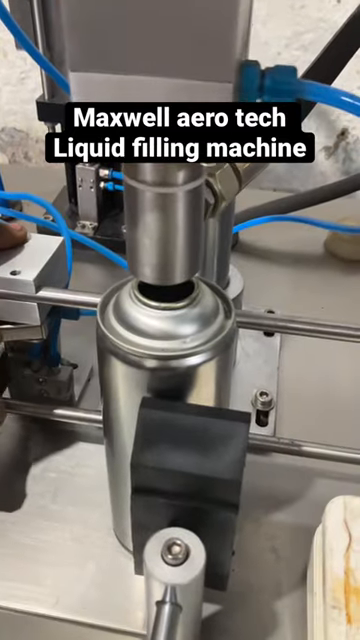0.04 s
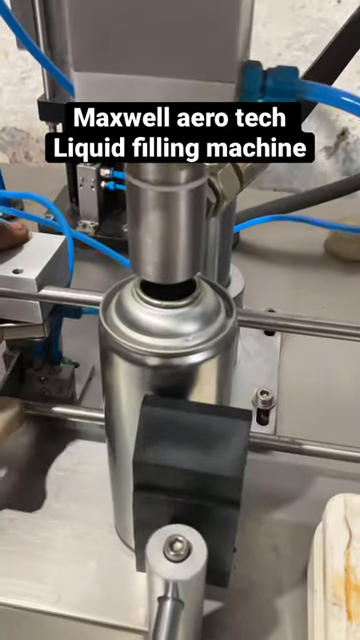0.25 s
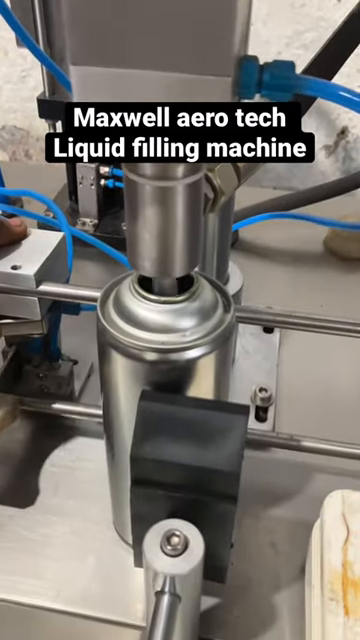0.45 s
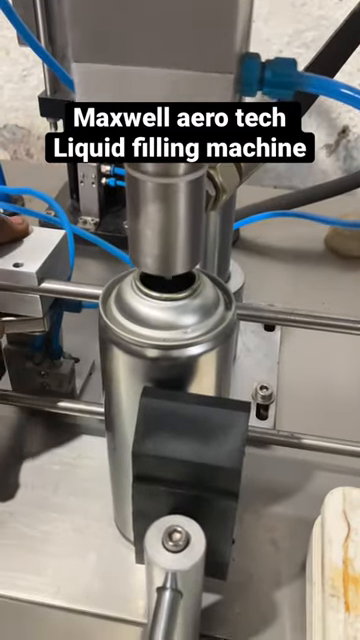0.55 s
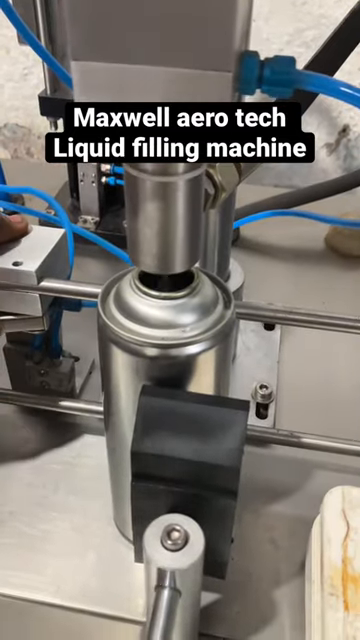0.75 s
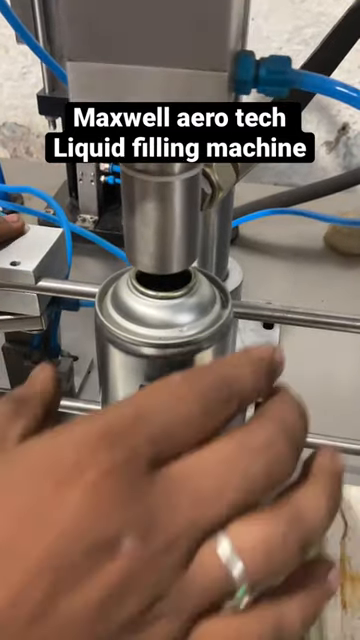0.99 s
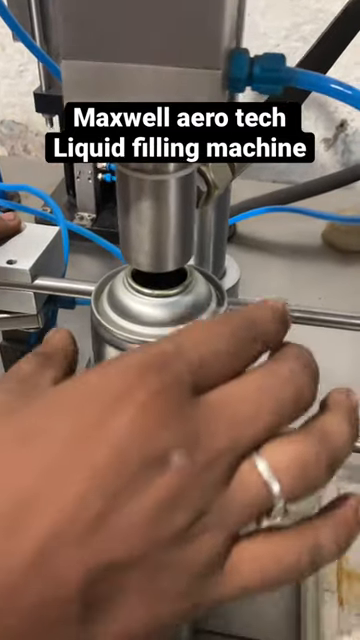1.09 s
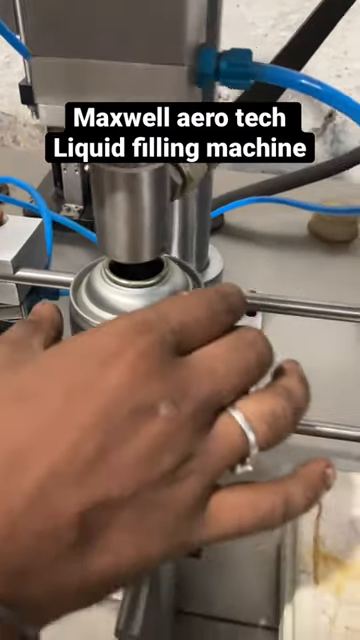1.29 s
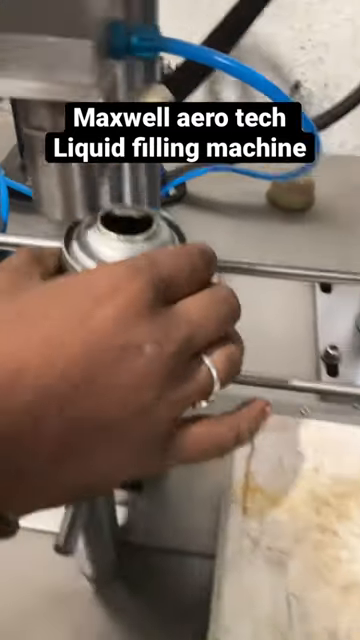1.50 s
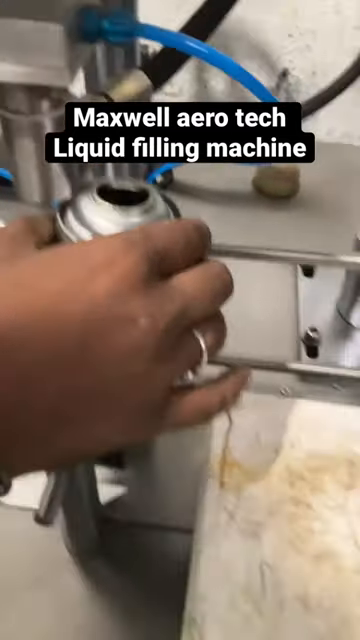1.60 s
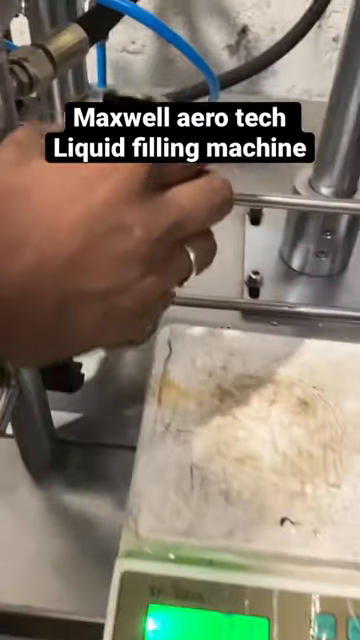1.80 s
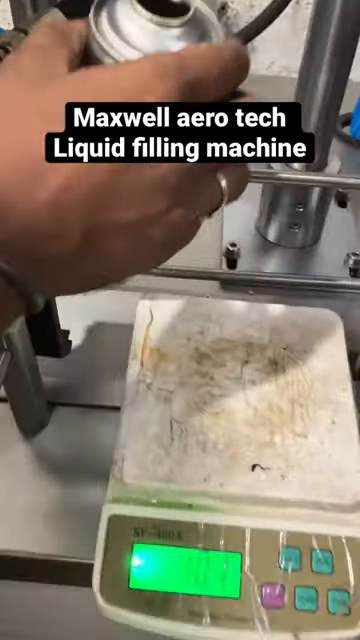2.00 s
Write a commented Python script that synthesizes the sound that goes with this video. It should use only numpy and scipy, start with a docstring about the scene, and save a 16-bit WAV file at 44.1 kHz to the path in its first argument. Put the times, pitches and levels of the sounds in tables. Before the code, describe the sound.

A pneumatic machine blasts hissing air, then a metal can clinks against guide rails.

```python
"""An air-powered filling machine

In a small workshop a valve clicks and a blast of air shakes the machine's frame. The cylinder
then empties in a long fading hiss and a last puff. A hand pulls out the filled steel can, which
rings as it knocks against the guide rails. A motor hums low underneath."""
import sys
import numpy as np
from scipy import signal
from scipy.fft import rfft, irfft, next_fast_len
from scipy.io import wavfile
from scipy.ndimage import map_coordinates

SR = 44100
rng = np.random.default_rng(int(sys.argv[2]) if len(sys.argv) > 2 else 0)


def transcribe(signal):
    """Save signal, clipped to [-1, 1], as a 16-bit WAV file at the path in sys.argv[1]."""
    frames = np.atleast_2d(signal).T
    limited = np.clip(frames, -1, 1)
    pcm = np.round(limited * 32767).astype(np.int16)
    wavfile.write(sys.argv[1], SR, pcm)


N = 90404
T = np.arange(N) / SR

# A colour says how strong a noise is from low to high. Each row: frequency in Hz, relative dB.
WORKSHOP_COLOUR = [(20, -32.5), (45, -12.5), (75, 0.5), (130, -5.5), (200, -8), (400, -11.5), (800, -15.5),
                   (1400, -21.5), (2300, -30), (3500, -32.5), (5000, -38.5), (9000, -37), (15500, -42)]
BUMP_COLOUR = [(70, -8.5), (180, -12.5), (380, 2.5), (750, -4), (1200, -14), (2500, -28), (8000, -43)]
SCRAPE_COLOUR = [(200, -0.5), (500, -1), (1900, -1.5), (2700, -10), (3700, -6.5), (5500, -19.5),
                 (8500, -9.5), (11500, -11.5), (15000, -11.5)]
CLICK_COLOUR = [(500, -11.5), (2400, -19), (3200, -4), (4500, -4.5), (6500, -0.5), (8200, -4),
                (11000, -0.5), (14500, -0.5), (16000, -7.5)]
CLACK_COLOUR = [(120, -22), (350, -2), (600, 2), (850, 1), (1080, -6), (1350, -1), (1700, 3), (1950, 0),
                (2350, -24), (6000, -34)]
FRAME_COLOUR = [(35, -16.5), (60, 10), (130, -6), (220, -23), (500, -31), (1500, -62)]
LEAK_COLOUR = [(150, -25), (800, -8.5), (1500, -4.5), (2700, -11), (3400, -3.5), (4500, -11.5), (6000, -14),
               (9000, -16), (10900, -5.5), (12200, -11), (15500, -1)]
SPURT_COLOUR = [(300, -12.5), (1500, -8), (3500, -4), (6000, -20.5), (8000, -8), (11000, 0.5),
                (13000, -5.5), (14700, 10.5), (15700, -9.5)]
BLAST_COLOUR = [(200, 5.5), (400, -11), (650, -4), (850, -10), (1100, -13), (1500, -5.5), (2100, -7.5),
                (3200, -6), (4200, -3), (6000, -1), (8000, -9), (10000, -4.5), (12000, -1.5), (14500, -6),
                (15700, -10)]
BITE_COLOUR = [(300, -30.5), (1200, -16.5), (2300, -0.5), (3300, -5), (4100, -1.5), (5300, 2.5),
               (6500, 4.5), (7500, -5.5), (10000, -9), (15200, -15)]
VENT_COLOUR = [(300, -33.5), (700, -14.5), (1400, -9.5), (2000, -13), (3400, -4.5), (4200, -16.5),
               (6200, -16), (7300, -3), (8500, 1.5), (11000, -0.5), (13000, 3), (14600, 7.5), (15700, -1)]
PUFF_COLOUR = [(300, -16), (800, -6), (1200, -4.5), (1580, 1), (1900, -10.5), (3500, -3.5), (5000, -11),
               (6200, -7), (7500, 0.5), (11000, 0), (13000, 3.5), (15600, 0)]
TRICKLE_COLOUR = [(500, -13.5), (1500, -6.5), (2300, -13), (3400, -0.5), (4200, -5), (5500, -11.5),
                  (8000, -17), (10300, -5.5), (12700, -12), (14000, -12.5), (15600, -7)]
SNAP_COLOUR = [(200, -3), (900, -18), (3300, -12), (4300, -2), (6800, -9), (8000, 0), (10400, -1),
               (11500, -8), (13300, -1), (14500, 5), (15700, 1)]

# How the longer sounds swell and fade. Each row: time in seconds, level in dB.
WORKSHOP_LEVEL = [(0, -43), (.2, -40.5), (.45, -49), (.9, -56.5), (1.1, -51), (1.4, -52), (1.9, -50),
                  (2.05, -49.5)]
MOTOR_LOAD = [(0, 6.5), (.22, 7.5), (.45, 2), (.6, -9), (.9, -1), (1.1, 2), (2.05, -2)]
SCRAPE_LEVEL = [(1.48, -80), (1.51, -50), (1.59, -59), (1.74, -49), (1.8, -67), (1.85, -64.5), (1.875, -54),
                (1.9, -58), (1.935, -50.5), (1.98, -58.5), (2.05, -61)]
SHAKE_LEVEL = [(.24, -58.5), (.257, -23.5), (.285, -32), (.322, -20), (.345, -35.5), (.395, -27),
               (.425, -47.5), (.52, -56), (.57, -43), (.65, -47.5), (.72, -41), (.81, -44.5), (.88, -50.5),
               (1.1, -67)]
# The motor's tones. Each row: pitch in Hz, level in dB before the load is added.
MOTOR_TONES = [(46.6, -55), (137, -58), (199, -66)]

# Short sounds. Each row: start in seconds, level in dB.
SOFT_BUMPS = [(0.054, -45.5), (1.009, -41.5), (1.515, -54)]
AIR_SQUEAKS = [(0.673, -16)]
VALVE_SNAPS = [(.3897, -5), (.4005, -16)]
# Thumps on the table. Each row: start in seconds, deep tone in dB, upper tone in dB.
TABLE_THUMPS = [(1.019, -34.5, -50), (1.521, -31.5, -41), (1.661, -32.5, -32.5)]
# Those two tones. Each row: pitch in Hz, seconds to fade by 60 dB.
TABLE_TONES = [(108, .1), (340, .15)]
# Ringing metal. Each row: pitch in Hz, relative level in dB, seconds to fade by 60 dB.
CAN_TONES = [(345, 1, .12), (560, -9, .05), (740, -7, .05), (1312, -2, .14), (1450, -9, .07),
             (1600, -5, .05), (1795, -4, .07), (2007, 0, .11), (2121, -12, .28), (3612, -19, .08),
             (3941, -23, .12), (4743, -17, .08), (8120, -22, .1), (10220, -24, .08)]
CLUNK_TONES = [(645, -33, .4), (1105, -29, .22)]
# Knocks on the can. Each row: start in seconds, ring in dB, click in dB, change to the low tones
# in dB, dull clack in dB, a number that multiplies the ring time.
CAN_KNOCKS = [(.165, -25.5, -27.5, -28, -48, .2), (.707, -43, -50, 1, -30.5, .6),
              (1.4975, -48, -35, -23, -47, 1.8), (1.516, -53, -44, -10, -52, 1),
              (1.612, -24.5, -24.5, -2, -19.5, .8), (1.6333, -44, -37, 6, -28, .45),
              (1.7157, -45, -32, 2, -22.5, .45)]

# Pitches at which each part likes to ring. Each row: pitch in Hz, width in Hz, relative dB.
FRAME_RESONANCES = [(65.9, 6, -6), (109.4, 6, 0), (181, 12, -12), (250, 50, -13), (320, 70, -14)]
PIPE_RESONANCES = [(645, 22, 0), (1100, 40, -2), (2070, 70, -4), (4105, 35, 1), (4880, 100, -4),
                   (5958, 30, 0), (6982, 22, 5), (8668, 30, -2), (10518, 25, -1)]
PORT_RESONANCES = [(2400, 300, -10), (4100, 150, 3), (4750, 160, -2), (5250, 220, 0), (6070, 130, -2),
                   (6620, 90, -5), (7930, 110, -9)]
# Jets of air: leak, spurt, blast, the exhaust's sharp first bite, long vent, puff, last trickle.
# Each row: start in seconds, level in dB, rise in seconds, hold in seconds, sag while open in dB
# per second, fall after closing in dB per second, brief boost or dip on opening in dB.
AIR_JETS = [(0.0, -44, 0.00071, 0.44, 3, 130, 1.5), (0.21, -28, 0.0033, 0.035, 63, 412, -6.5),
            (0.236, -18, 0.019, 0.11, 17.5, 253, 3.5), (.391, -21.5, .004, .27, 58, 150, 6.5),
            (0.393, -18.5, .008, 0.36, 31.5, 170, -1.5), (0.746, -27, 0.0078, 0.012, 49, 163, 3),
            (0.76, -46.5, 0.11, 0.15, 5.5, 132, 1)]

# The room's echo. Each row: frequency in Hz, seconds to fade by 60 dB.
ROOM_FADE = [(200, 0.33), (2000, 0.45), (12000, 0.031)]
# Left and right channels. Each row: frequency in Hz, how alike their noise is (1 means the same).
CHANNEL_LIKENESS = [(100, .99), (350, 0.92), (800, 0.23), (2200, 0.45), (3400, 0.73), (4600, 0.6), (5500, 1),
                    (7000, 0.81), (7900, 1), (9000, 0.57), (10200, 0.26), (11200, 1), (12300, 1), (13200, 0.23),
                    (14700, 1)]
# Each row: frequency in Hz, how far the left wave runs ahead in radians.
CHANNEL_LEAD = [(20, 0), (300, -.1), (800, -.35), (1400, .1), (2300, 1.3), (4200, 2.0), (5500, 3.14),
                (6800, 4.5), (7700, 6.1), (9100, 6.4), (10200, 7.8), (11200, 9.3), (12200, 9.5), (13300, 10.9),
                (14500, 12.5)]
# Each row: frequency in Hz, left level minus right level in dB.
CHANNEL_BALANCE = [(60, -.3), (400, -0.63), (1200, -2.7), (2400, -1.5), (4400, 1), (8000, 1)]

LOW_TONES_HZ, CAN_PAN_DB = 1900, -1.5  # the can sits a little to the right
RING_ATTACK_S, CLICK_ATTACK_S, CLUNK_S = .0013, .00015, .248
JET_LOW_HZ, KICK_S = 169, .014
PIPES_DB, PORT_DB, FLUTTER_DB = -11.5, -6, .3
ROOM_DB, WALLS_DB, WALLS_DELAY_S = -10.5, -11, .008
CEILING, TOP_HZ = .85, 15780


def amp(db):
    """Turn decibels into a number to multiply by."""
    return 10 ** (np.asarray(db) / 20)


def unit(x):
    """Scale a signal so its average power is 1."""
    return x / np.sqrt(np.mean(x ** 2) + 1e-20)


def along(points, hz):
    """Read between the rows of a frequency table, with octaves evenly spaced."""
    freqs, values = np.transpose(points)
    return np.interp(np.log(hz + 1), np.log(freqs + 1), values)


def level(points):
    """Join (seconds, dB) points into a loudness curve."""
    return amp(np.interp(T, *np.transpose(points)))


def wobble(rate):
    """A smooth curve through `rate` random values a second."""
    return map_coordinates(rng.standard_normal(2048), [T * rate], mode="wrap")


def filtered(x, response):
    """Multiply each frequency in x by response(frequency)."""
    size = next_fast_len(N + SR // 2)
    return irfft(rfft(x, size) * response(np.fft.rfftfreq(size, 1 / SR)), size)[..., :N]


def noise(response):
    """Filtered stereo noise, partly alike in the left and right channels."""
    def split(hz):
        angle = np.arccos(np.clip(along(CHANNEL_LIKENESS, hz), -1, 1)) / 2
        return response(hz) * np.array([np.cos(angle), np.sin(angle)])
    common, apart = filtered(rng.standard_normal((2, N)), split)
    return unit(np.array([common + apart, common - apart]))


def rush(colour, low_hz=25):
    """Noise of a given colour, turned down below low_hz."""
    return noise(lambda hz: amp(along(colour, hz)) * hz ** 2 / (hz ** 2 + low_hz ** 2))


def ringing_noise(resonances):
    """Noise squeezed into narrow bands, so that it whistles."""
    return noise(lambda f: sum((-1) ** k * amp(db) * 1j * f * width / (hz**2 - f**2 + 1j * f * width)
                               for k, (hz, width, db) in enumerate(resonances)))


def struck(start, fade, attack):
    """Rise quickly, then die away by 60 dB every `fade` seconds."""
    t = np.maximum(T - start, 0)
    return (1 - np.exp(-t / attack)) * np.exp(-np.log(1000) * t / fade)


def hits(events, fade, attack):
    """A loudness curve with one strike for each (seconds, dB) row."""
    return sum(amp(db) * struck(start, fade, attack) for start, db in events)


def room(x):
    """The workshop's short echo, in which the treble dies first."""
    hz, t, spectrum = signal.stft(rng.standard_normal((2, SR // 2)), SR, nperseg=256)
    decay = np.exp(-np.log(1000) * t / along(ROOM_FADE, hz)[:, None])
    tail = signal.istft(spectrum * decay, SR, nperseg=256)[1]
    return signal.fftconvolve(x, tail / np.linalg.norm(tail[0]), axes=1)[:, :N]


def walls(x):
    """Add eight quick echoes from the steel panels near the nozzle."""
    delays = rng.uniform(0.1021, 1, 8) * WALLS_DELAY_S
    gain = amp(WALLS_DB) / np.sqrt(len(delays))
    return filtered(x, lambda hz: 1 + gain * sum(np.exp(-2j * np.pi * hz * s) for s in delays))


def workshop():
    """The room rumbles, and a slightly unsteady motor hums louder under load."""
    hum = sum(amp(db) * np.sqrt(2) * np.sin(2 * np.pi * hz * T + 0.13 * wobble(4.7))
              for hz, db in MOTOR_TONES)
    return level(WORKSHOP_LEVEL) * rush(WORKSHOP_COLOUR) + level(MOTOR_LOAD) * hum


def handling():
    """Nozzle and hand bump softly; the can thumps the table and scrapes unevenly over it."""
    bumps = hits(SOFT_BUMPS, fade=.29, attack=.00069) * rush(BUMP_COLOUR)
    thumps = np.zeros(N)
    for start, *levels in TABLE_THUMPS:
        for db, (hz, fade) in zip(levels, TABLE_TONES):
            thumps += amp(db) * struck(start, fade, attack=.006) * np.sin(2 * np.pi * hz * (T - start))
    scrape = level(SCRAPE_LEVEL) * amp(2.5 * wobble(110)) * rush(SCRAPE_COLOUR)
    return bumps + thumps + scrape


def can():
    """Each knock clicks, clacks and rings the can; some ring mostly its high tones."""
    out = np.zeros((2, N))
    click, clack = rush(CLICK_COLOUR), rush(CLACK_COLOUR)
    for start, ring_db, click_db, low_db, clack_db, length in CAN_KNOCKS:
        for hz, db, fade in CAN_TONES:
            phase = 2 * np.pi * hz * (T - start) + .25 * wobble(90)
            gain = amp(ring_db + db + low_db * (hz < LOW_TONES_HZ) + rng.normal(0, 1))
            out += gain * struck(start, fade * length, RING_ATTACK_S) * np.sin(phase)
        out += amp(click_db) * struck(start, fade=.029, attack=CLICK_ATTACK_S) * click
        out += amp(clack_db) * struck(start, fade=.009, attack=CLICK_ATTACK_S) * clack
    return out


def frame():
    """The piston starts with a clunk, then shakes the frame at its low, wandering pitches."""
    clunk, tones = np.zeros((2, N))
    for hz, db, fade in CLUNK_TONES:
        phase = 2 * np.pi * hz * T + 0.65 * wobble(60)
        clunk += amp(db) * struck(CLUNK_S, fade, RING_ATTACK_S) * np.sin(phase)
    for hz, width, db in FRAME_RESONANCES:
        pitch = hz + width / 2 * wobble(41.07)
        tones += amp(db) * np.sin(2 * np.pi * np.cumsum(pitch) / SR + rng.uniform(0, 2 * np.pi))
    rumble = amp(-6.5) * rush(FRAME_COLOUR)
    return clunk + level(SHAKE_LEVEL) * unit(unit(tones) + rumble)


def valve(start, db, attack, hold, sag, fall, kick_db):
    """Air flow through a valve: it opens, sags as the pressure drops, then closes."""
    t = T - start
    open_s = np.maximum(t - attack, 0)
    kick = kick_db * np.exp(-(open_s / KICK_S) ** 2)
    drop = sag * np.minimum(open_s, hold) + fall * np.maximum(open_s - hold, 0)
    return np.clip(t / attack, 0, 1) * amp(db + kick - drop)


def exhaust_port():
    """Air rings in the outlet hole, each pitch wavering in loudness."""
    return unit(sum(amp(db + 2 * wobble(30)) * np.sqrt(width) * ringing_noise([(hz, width, 0)])
                    for hz, width, db in PORT_RESONANCES))


def air():
    """Swirling jets hiss, whistle and squeak; the exhaust valve snaps open and bounces."""
    colours = [LEAK_COLOUR, SPURT_COLOUR, BLAST_COLOUR, BITE_COLOUR,
               VENT_COLOUR, PUFF_COLOUR, TRICKLE_COLOUR]
    flows = [valve(*jet) for jet in AIR_JETS]
    blast, bite = flows[2:4]
    hiss = sum(flow * rush(colour, JET_LOW_HZ) for flow, colour in zip(flows, colours))
    port = amp(PORT_DB) * bite * exhaust_port()
    pipes = amp(PIPES_DB) * blast * ringing_noise(PIPE_RESONANCES)
    squeak = hits(AIR_SQUEAKS, fade=.024, attack=.001) * ringing_noise([(7970, 290, 0)])
    snap = hits(VALVE_SNAPS, fade=.045, attack=.0003) * rush(SNAP_COLOUR, JET_LOW_HZ)
    flutter = amp(FLUTTER_DB * wobble(28))
    return snap + (hiss + port + pipes + squeak) * flutter


def scene():
    """Machine, can and workshop together."""
    knocks = can() * amp(CAN_PAN_DB * np.array([[.5], [-.5]]))
    return walls(air()) + frame() + knocks + amp(ROOM_DB) * room(knocks) + handling() + workshop()


def record(dry):
    """The left and right channels differ in timing and level; loud peaks are rounded off and the top treble is
    cut."""
    sides = np.array([[.5], [-.5]])
    pair = filtered(dry, lambda hz: np.exp(1j * sides * along(CHANNEL_LEAD, hz))
                    * amp(sides * along(CHANNEL_BALANCE, hz)))
    rounded = pair / (1 + np.abs(pair / CEILING) ** 8) ** (1 / 8)
    return filtered(rounded, lambda hz: 1 / np.sqrt(1 + (hz / TOP_HZ) ** 260))


dry = scene()
out = record(dry)
transcribe(out)
```